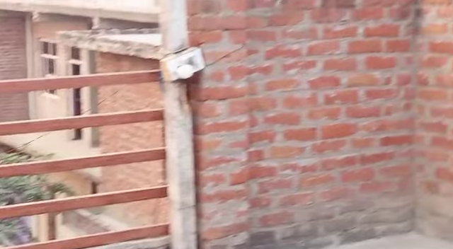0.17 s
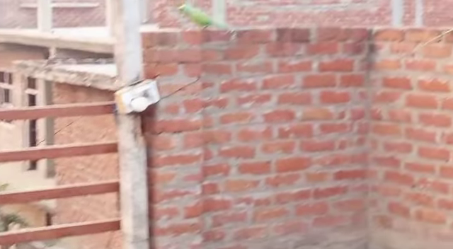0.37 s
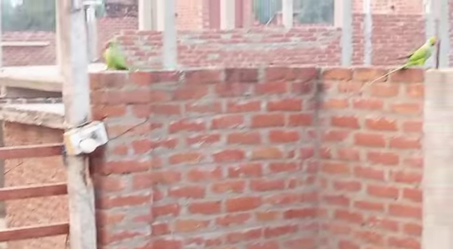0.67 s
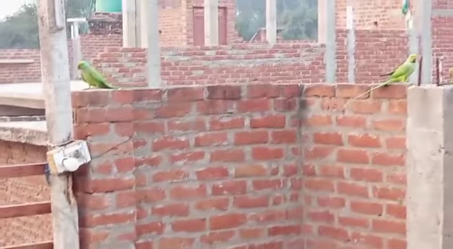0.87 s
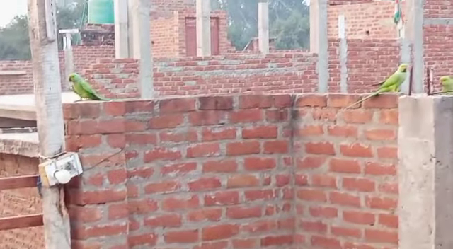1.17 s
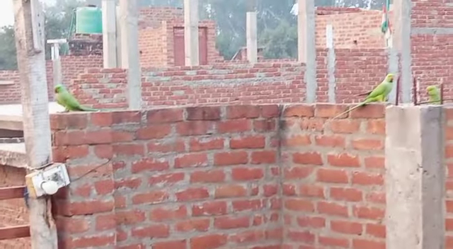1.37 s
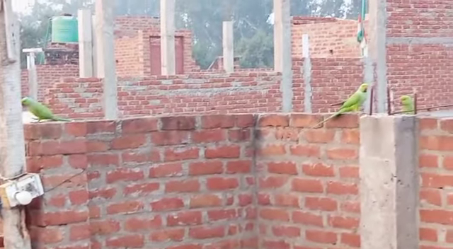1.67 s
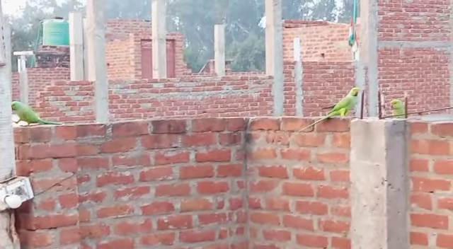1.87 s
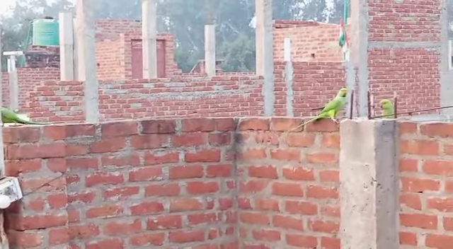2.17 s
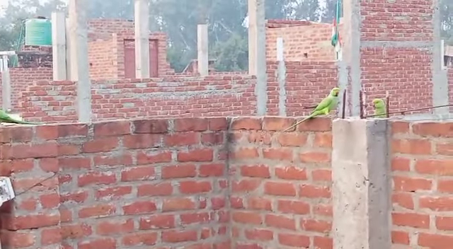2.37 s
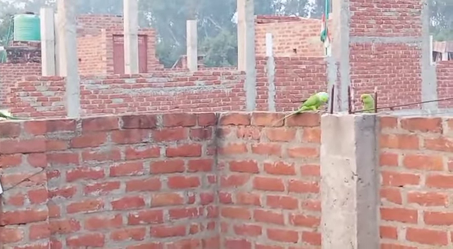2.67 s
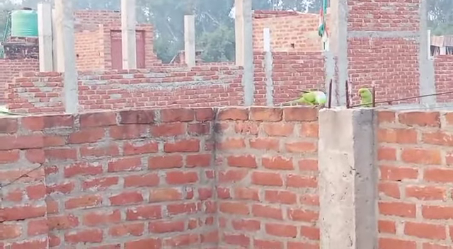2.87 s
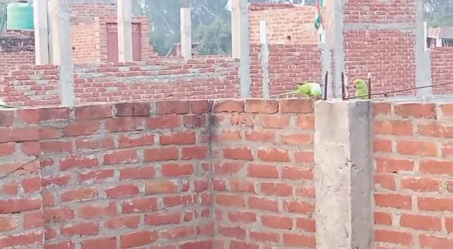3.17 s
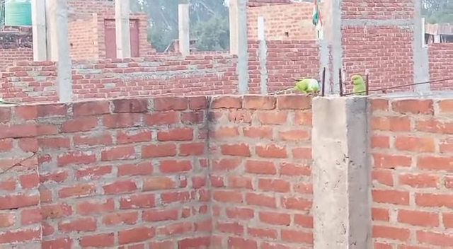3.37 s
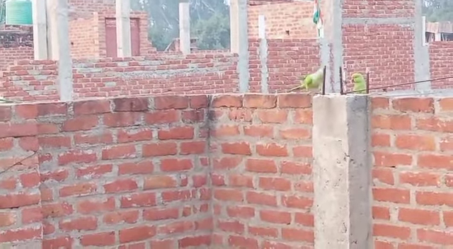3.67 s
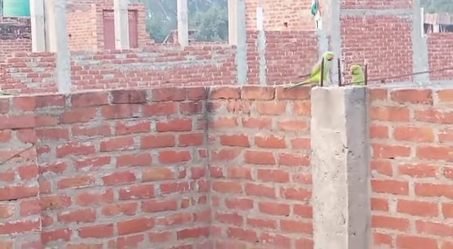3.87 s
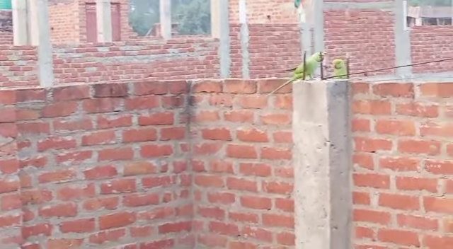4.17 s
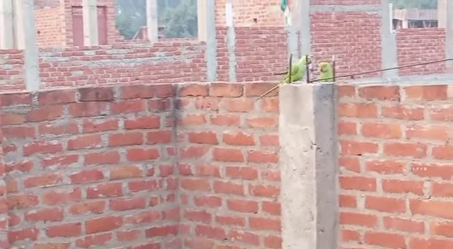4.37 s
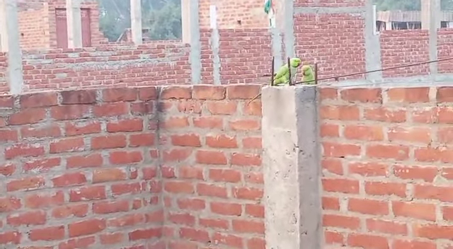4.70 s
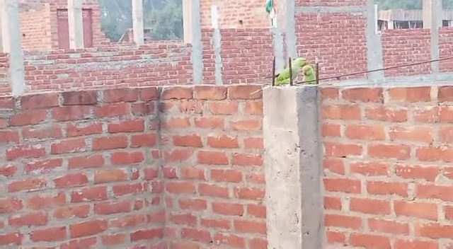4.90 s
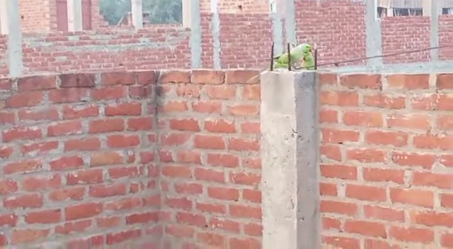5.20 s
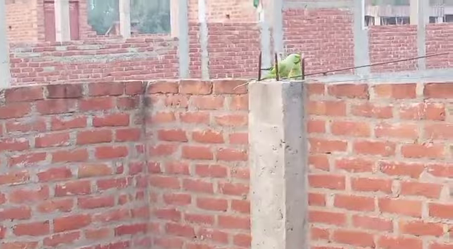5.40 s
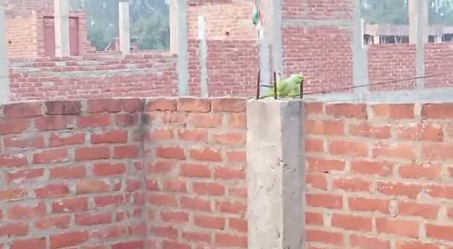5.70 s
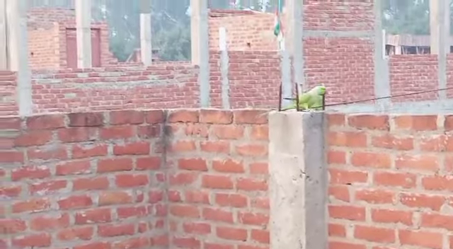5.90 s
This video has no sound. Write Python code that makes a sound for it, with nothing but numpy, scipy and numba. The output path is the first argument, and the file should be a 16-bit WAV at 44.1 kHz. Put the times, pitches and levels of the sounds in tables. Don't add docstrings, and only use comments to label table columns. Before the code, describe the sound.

Parakeets call loudly a few metres away on brick rooftops, picked up by a phone microphone with short wall echoes. From 0 to 0.5 s a rough shriek, a piercing whistle and a dropping cry run into barking yelps and a brief chatter. Around 0.6-1.2 s calls fall and bray more softly, with faint birds farther off. At 1.2-1.9 s a yelp, a high arching whistle and strong raspy shrieks arrive. Chatter and a loud nasal rise fill 1.9-2.4 s; after a short thinning, harsh screeches and stuttering chatter fill 2.65-3.7 s. Near 3.8 s a clear whistle dives under a swelling shriek. Rattles and a big grating bray come at 4.2-4.7 s, then plunging squawks, low chatter and a leaping whistle, a bright burst at 5.45 s, and a thinner last call fading by 5.95 s. A low town hum and faint engine thuds continue throughout, the engine slightly clearer after 3 s.

```python
import sys
import numpy as np
from scipy import signal
from scipy.fft import rfft, irfft, next_fast_len
from scipy.io import wavfile
from scipy.ndimage import uniform_filter1d
from numba import njit

SR = 44100
rng = np.random.default_rng(int(sys.argv[2]) if len(sys.argv) > 2 else 0)


def unload_audio(sound):
    columns = np.transpose(np.atleast_2d(sound))
    steps = np.round(np.clip(columns, -1, 1) * 32767)
    wavfile.write(sys.argv[1], SR, steps.astype(np.int16))


def to_linear_factor(level_db):
    exponent = np.asarray(level_db, float) / 20
    return 10 ** exponent


N = 266805

# frequency_hz, level_db
TOWN_COLOUR = [(79, -4.5), (135, 0), (418, -12), (1520, -9), (2260, -12.5), (3360, -12.5), (5000, -28),
               (7440, -30), (9820, -45), (15500, -43)]

# time_s, firings
FIRINGS = [(0, 0), (2.014, 27.5), (2.303, 31.5), (2.805, 38.5), (3.501, 48.5), (4.053, 56.5), (4.518, 63.5),
           (5.024, 71.5), (5.519, 79.5), (6.06, 88.6)]
# time_s, level_db
ENGINE_LEVEL = [(0, -48), (1, -44.5), (2, -48), (3, -41), (4, -40), (5, -41), (6.05, -41)]
# centre_hz, width_hz, level_db
EXHAUST = [(68.2, 4.3, -0.5), (119.3, 9.9, -2), (174, 45, -7), (293, 62, -8.5), (354, 90, -11)]

# start_s, end_s, peak_db, treble_db, throat_hz
AIRY_SWELLS = [(0.001, 0.105, -22, -10, 1720), (1.2, 1.313, -31, 9, 3130), (1.672, 1.868, -27.5, 5, 2270),
               (2.658, 2.871, -21.5, -15, 1560), (3.781, 4.112, -21.5, 4.5, 2740)]
AIRY_FADES = [(0.145, 0.21, -24.5, -3, 2980), (.3, 0.4, -27.5, -22, 2750), (0.66, 0.86, -32, -1, 2570),
              (0.877, 1.16, -38.5, 7, 2453), (2.866, 3.243, -29.5, -2, 1840),
              (3.229, 3.4, -24.5, 11.5, 2670), (4.915, 5.099, -25.5, 3.5, 2210)]
LOW_SWELLS = [
    (1.506, 1.66, -19, -2, 1668),
]
DRY_SWELLS = [(.45, 0.626, -41, -36, 1860), (1.938, 2.125, -22.5, 5, 3290), (2.118, 2.38, -34, 17, 3100),
              (2.399, 2.5, -27.5, -4, 1510), (4.39, 4.675, -19, 8, 2800), (4.742, 4.908, -27.5, -6, 1660),
              (5.656, 5.973, -41, 13, 2410)]
DRY_FADES = [
    (1.43, 1.492, -19, 0.97, 3440),
    (3.472, 3.69, -23, 0.5, 2390),
    (5.45, 5.62, -25, 3, 4050),
]
# start_s, end_s, centre_hz, width_hz, level_db
SHEENS = [(.01, 0.12, 10200, 1500, -47.5), (.3, 0.475, 9400, 1500, -40.5), (.66, .87, 9100, 1500, -48),
          (1.53, 1.86, 11700, 2507, -57), (1.94, 2.357, 10900, 900, -58), (2.1, 2.36, 14800, 800, -71),
          (2.662, 2.875, 10070, 500, -51.5), (2.66, 3.2, 13400, 3500, -60), (3.23, 3.4, 14000, 2500, -53),
          (3.23, 3.406, 9800, 2500, -41), (3.48, 3.657, 10200, 2000, -65), (3.79, 4.113, 10000, 2000, -50),
          (4.353, 4.683, 11160, 1200, -53), (4.35, 4.68, 9240, 800, -45), (4.45, 4.66, 15000, 700, -62.5),
          (4.903, 5.081, 10700, 2500, -67), (5.366, 5.442, 9050, 2000, -46),
          (5.427, 5.59, 9440, 1200, -38.5), (5.433, 5.597, 7740, 1200, -29)]

# frequency_hz, level_db
BEAK = [(2500, 11), (4500, -16.5), (6500, -5.5), (8000, -8.5), (9000, -25), (11500, -32), (13000, -44),
        (15500, -31)]

# start_s, length_s, first_pitch_hz, second_pitch_hz, level_db
OPENERS = [(.012, .075, 1789, 1247, -33)]
HOOKS = [(.012, 0.06, 1344, 1054, -35), (3.29, 0.074, 1010, 844, -36.5)]
YELPS = [(.265, 0.059, 1586, 1325, -19), (.4, 0.045, 1455, 1120, -19.5), (1.198, 0.07, 1716, 1326, -24.5),
         (1.438, .04, 1987, 1300, -26), (2.335, .04, 1257, 1155, -32.5)]
GROWLS = [(.31, .085, 1328, 1490, -27)]
CRESTS = [(.335, .075, 1408, 1461, -23)]
RASPS = [(3.49, 0.1627, 1218, 1253, -27), (1.94, .17, 1100, 1230, -30.5)]
PLUNGES = [(4.768, 0.036, 2350, 1400, -27.5), (4.83, 0.074, 2123, 1498, -31),
           (4.925, .065, 1049, 789, -29.5), (2.42, .07, 1300, 900, -39.5)]
FLATS = [(2.93, .12, 1080, 1068, -34), (2.87, 0.0438, 1500, 1080, -33)]
DULL_HOOKS = [(3.46, 0.031, 1643, 1592, -29.5), (4.742, 0.00933, 816, 717, -28.5)]
HOARSE_SQUEALS = [(3.47, 0.079, 1836, 1934, -21)]
SNARLS = [(4.0, 0.094, 1300, 1285, -31.5)]
BRAYS = [(4.385, .27, 882, 1218, -31)]
LUNGES = [(5.445, .165, 1716, 1326, -22.5)]

# start_s, length_s, first_pitch_hz, second_pitch_hz, level_db. In PIPINGS the
# rows at 2.53 and 2.56 s are two upper partials of a farther bird's low call, and the row at 0.41 s is a faint
WHISTLES = [(.082, 0.069, 2106, 2170, -13.5), (3.5, 0.048, 2055, 2100, -25),
            (3.815, 0.069, 2144, 2152, -15), (5.34, .19, 1083, 1358, -26)]
PIPINGS = [(2.34, 0.04, 1700, 1760, -33.5), (2.41, .06, 1580, 1620, -42), (2.38, 0.056, 3250, 3150, -36),
           (2.53, 0.114, 3050, 3150, -46), (2.56, 0.093, 2600, 2600, -48), (.41, .12, 4000, 4400, -48)]
DULL_GLIDES = [(1.61, 0.34, 1600, 1090, -35.5), (1.51, 0.13, 1900, 1500, -32.5)]
GLIDES = [(1.545, 0.315, 1437, 894, -37.5)]
SQUEALS = [(1.79, 0.13, 1837, 1830, -35)]
RISES = [(2.1, .26, 895.4, 959.6, -18)]
UNDERTONES = [(2.12, .21, 1016, 1060, -28)]
HOOTS = [(3.2, 0.058, 915, 965, -37), (2.8, 0.092, 790, 925, -42)]
ARCHES = [(3.215, 0.09, 882, 1038, -24.5)]
PEEPS = [(3.8, 0.0356, 1767, 1563, -23.5), (3.855, 0.032, 1610, 1510, -40)]
DROPS = [(3.882, .19, 1843, 1417, -15.5)]
LEAD_INS = [(4.18, .11, 2250, 1445, -46)]
TOOTS = [(5.19, .065, 764, 750, -29.5)]
LEAPS = [(5.382, .085, 1248, 1723, -19)]

# start_s, length_s, first_pitch_hz, second_pitch_hz, level_db
FARTHEST_CALLS = [(.27, 0.23, 841, 858, -41.5), (.5, .11, 854, 849, -36), (.63, 0.21, 834, 830, -40.5),
                  (2.78, 0.096, 842, 830, -38.5), (5.45, 0.067, 546, 644, -40)]
FAR_CALLS = [(1.17, 0.23, 858, 855, -44.5), (1.3, 0.065, 610, 650, -57), (4.77, 0.049, 594, 645, -34.5),
             (4.83, 0.097, 913, 960, -36)]

# time_s, pitch_hz, level_db
FIRST_DROP = [
    (.145, 1884, -38),
    (.165, 1658, -16.5),
    (.22, 1635, -16.5),
    (.255, 1601, -19.5),
    (.3, 1420, -26),
]
LONG_FALL = [(.625, 1518, -31), (.665, 1135, -30), (.7, 990, -35.5), (.8, 922.5, -27.5), (.9, 921.4, -29),
             (1.0, 910, -32.5)]
FIRST_BRAY = [
    (.645, 999, -36),
    (.665, 1232, -28),
    (.72, 1284, -25.5),
    (.8, 1248, -23.5),
    (0.869, 1202, -28),
]
DIP = [
    (.92, 865, -33),
    (.99, 836, -28.5),
    (1.04, 880, -32),
    (1.1, 900, -33),
    (1.15, 894, -37.5),
]
HIGH_ARCH = [(1.26, 1510, -37), (1.3, 2247, -32.5), (1.34, 2563, -27.5), (1.38, 2650, -26),
             (1.402, 2597, -20), (1.424, 1832, -31), (1.465, 1083, -37.5)]
FIRST_GRATE = [(2.66, 1080, -31), (2.7, 1098, -28), (2.8, 1103, -28), (2.85, 1140, -36)]
LOW_CALL = [(3.05, 766, -44.5), (3.201, 713.6, -37), (3.26, 624, -43.5), (3.331, 572, -43.5),
            (3.451, 601.4, -38.5), (3.629, 659, -53)]
DIVE = [(3.775, 1785, -21), (3.8, 1637, -20), (3.83, 1285, -30.5), (3.86, 1099, -25), (3.92, 935, -30),
        (3.982, 878, -28), (4.119, 1004, -35)]
BIG_GRATE = [(4.35, 1040, -27), (4.4, 1140, -24.5), (4.45, 1219, -18.5), (4.52, 1150, -19),
             (4.58, 1088, -20), (4.65, 1059, -24.5)]
SWOOP = [
    (4.9, 1403, -34.5),
    (4.93, 1102, -33),
    (4.96, 1255, -31.5),
    (5.05, 1275, -28.5),
]
LAST_CALL = [(5.629, 1044, -42), (5.701, 1123, -40), (5.8, 1161, -34), (5.88, 1167, -32), (5.92, 1135, -37),
             (5.946, 880, -38.5)]

# share of length 0-1, share of the way to the second pitch, level_db
DROP_SHAPE = [(0, 0.0045, -17), (.11, .5, 1.5), (.5, .55, -2), (.72, .68, -5.5), (0.999, 0.99, -8.5)]
STEADY_SHAPE = [(0, 0.0087, -5.5), (.6, .65, -0.5), (1, 0.95, -0.5)]
GLIDE_SHAPE = [(0, 0.19, 3.5), (.22, .48, 2), (.45, .82, 0.5), (1, 0.99, -5.5)]
HOOK_SHAPE = [(0, 0.002, -6), (0.552, 0.324, 1), (1, 0.95, 1.5)]
ARCH_SHAPE = [(0, -0.051, -6.5), (0.298, 0.97, -1), (.65, 0.99, -1), (1, -.3, 2)]
SWELL_SHAPE = [(0, 0.028, -6.5), (0.301, 0.9, 2), (0.601, .8, -2), (1, 0.082, -4)]
RISE_SHAPE = [(0, 0.0053, -13), (.27, .85, -9.5), (.75, 1, -2), (1, 0.94, -9)]
CLIMB_SHAPE = [(0, 0.02, -3.5), (0.452, .7, -4.5), (.8, 1, -2), (1, 0.97, -10.5)]
SLUMP_SHAPE = [(0, 0, -4.5), (.3, 0.38, -2.5), (.7, .8, -3.5), (1, 1, -6)]
FLARE_SHAPE = [(0, 0.0098, -6), (.12, 0.82, 0), (.35, 0.99, -0.5), (1, 1, 4.5)]
PLUNGE_SHAPE = [(0, 0.0089, -3.5), (.7, 0.202, 0), (1, 1, 4)]

# frequency_hz, level_db
TIGHT = [(900, -16.5), (1700, -15), (2150, -12), (3200, -4.5), (4300, -5.5), (5000, -37), (6500, -9.5),
         (8600, -12)]
OPEN = [(600, -5), (1000, -5.5), (2200, -1.5), (3300, -5.5), (4500, -11.5), (6500, -14)]
SHARP = [(800, -10), (1300, -5.5), (2200, -1.5), (3000, 1.5), (4300, 0), (6500, -17)]
HOARSE = [(1150, -18), (1600, -16), (2400, -4.5), (3300, -5), (3700, -4.5), (4700, -18.5), (6500, -18)]
PURE = [(1500, -2.5), (2500, -1), (3700, 2), (5000, -5.5), (7500, -8), (10000, -30.5)]
DEEP = [(900, -14.5), (1700, -19.5), (2000, -5.5), (3000, 1), (3600, -2.5), (5200, -15.5), (7000, -3.5)]
DISTANT = [(600, -8), (850, -6), (1600, -6), (2500, -8), (3400, -25)]
MUFFLED = [(600, -5), (850, -1), (1700, -10), (2500, -9.5), (3400, -29)]
RINGING = [(1600, -15), (3250, -1.5), (4900, -9), (6500, -19.5)]
NASAL = [(950, -23.5), (1300, -19), (1900, -13), (2700, -5), (3800, -6.5), (5000, -15)]
SHRILL = [(1850, -35), (3700, -11), (5600, -4), (7500, -19)]
BLUNT = [(800, -10), (1600, 2.5), (2200, -2), (4300, -11), (6500, -4.5), (8700, -33)]
REEDY = [(900, -13.5), (1800, -9.5), (2700, -7.5), (3600, -12)]
YELPING = [(1300, -15.5), (2800, 2), (3600, -11.5), (4400, -12), (6500, -15)]
BRAYING = [(1200, -16.5), (2450, -2.5), (3700, -5), (4900, -17)]
GRATING = [(1100, -24), (2200, -19), (3300, -1), (4400, -16.5)]
STACKED = [(1250, -11), (2500, -4), (3800, -3), (5000, -3)]
PIPING = [(1700, 0), (4500, -2.5), (5000, -32), (9000, -40)]
SQUAWKING = [(1500, -11), (3000, -2.5), (4200, -2.5), (5200, -3.5), (6500, -4)]
HOLLOW = [(1000, -6), (1600, -1), (2200, 0), (3500, -10), (4500, -7.5), (6500, -21)]
SAGGING = [(1600, -18), (3180, -9), (3290, 1.5), (4800, 1), (4960, -11.5), (6500, -13.5)]
ARCHING = [(1450, -16), (2900, -6), (4400, -3), (5900, -16)]
LEAPING = [(1600, -16), (3400, 0), (4500, -18), (5050, -3), (6500, -21)]
TOOTING = [(750, -3.5), (1500, 0), (2250, -18), (3000, -25)]

# start_s, period_s, pitch_hz, level_db, open share 0-1
CHATTER = [(0.447, 0.024, 1950, -31.5, 0.45), (1.942, 0.019, 1936, -30, 0.86),
           (3.064, 0.021, 2105, -27, 0.6), (4.188, 0.025, 1636, -29, 0.49),
           (4.189, 0.0258, 2150, -29.5, 0.47), (4.341, .0098, 1050, -22, 0.59),
           (5.086, 0.027, 1010, -30.5, 0.68), (3.0, 0.022, 1680, -35, 0.56)]
CHATTER_COUNT = [6, 7, 9, 6, 6, 6, 10, 9]
# frequency_hz, level_db
CHATTER_THROAT = [(1000, -5), (2000, -2.5), (3100, -14), (3700, -20)]
RATTLE_THROAT = [(1000, -11), (2000, -7), (3100, -5), (4200, -16.5)]
# pitch_hz, level_db
CHATTER_UPPER = [(1064, -3.5), (1900, -29)]
# time_s, peak_db
SNAPS = [(0.5003, -49), (0.5237, -51), (0.549, -48), (1.937, -43), (1.955, -43), (1.9689, -41),
         (1.9899, -40), (4.1694, -49), (4.1954, -50), (4.2443, -44), (4.2667, -43), (4.2941, -44),
         (4.32, -47)]


def level(x, db):
    return x * to_linear_factor(db) / np.sqrt(np.mean(x ** 2))


def wobble(size, hz):
    settle = 2000
    noise = rng.standard_normal(size + settle)
    return level(signal.lfilter(*signal.butter(2, hz, fs=SR), noise)[settle:], 0)


def on_log(table, hz):
    f, db = np.transpose(table)
    return np.interp(np.log(hz), np.log(f), db)


@njit
def moving_band(x, hz, width):
    y, b, l = np.empty(len(x)), 0., 0.
    for i in range(len(x)):
        g, k = np.tan(np.pi * hz[i] / SR), width / hz[i]
        v = (b + g * (x[i] - l)) / (1 + g * (g + k))
        b, l, y[i] = 2 * v - b, l + 2 * g * v, k * v
    return y


def band(x, hz, width):
    return moving_band(x, np.full(len(x), 1. * hz), 1. * width)


def double_band(x, hz, width):
    return band(band(x, hz, width), hz, width)


def town():
    size = next_fast_len(N)
    hz = np.maximum(np.arange(size // 2 + 1) * SR / size, 1)
    spectrum = rfft(rng.standard_normal(size)) * to_linear_factor(on_log(TOWN_COLOUR, hz))
    hum = irfft(spectrum, size)[:N]
    return level(hum * to_linear_factor(1.2 * wobble(N, 5.)), -43.5)


def engine():
    s, count = np.transpose(FIRINGS)
    timing, strength = rng.standard_normal((90, 2)).T
    times = np.interp(np.arange(90) - .5, count, s) + 0.0025 * timing
    pulses = np.zeros(N)
    pulses[np.clip(times * SR, 0, N - 1).astype(int)] = to_linear_factor(0.73 * strength)
    pipe = np.zeros(N)
    for k, (hz, width, db) in enumerate(EXHAUST):
        pipe += (-1) ** k * level(band(pulses, hz, width), db)
    pipe = signal.sosfilt(signal.butter(4, [48, 480], "bandpass", fs=SR, output="sos"), pipe)
    return level(pipe, 0) * to_linear_factor(np.interp(np.arange(N) / SR, *np.transpose(ENGINE_LEVEL)))


def chaotic_pulses():
    scatter, strength = rng.standard_normal((N // 16, 2)).T
    unsteady = .055 * scatter + .06 * wobble(N // 16, 1500)
    places = np.cumsum(1 + SR / 980 * np.exp(unsteady)).astype(int)
    inside = places < N
    pulses = np.zeros(N)
    pulses[places[inside]] = to_linear_factor(5.6 * np.clip(strength, -2, 2))[inside]
    pulses = pulses * to_linear_factor(1.1 * wobble(N, 490) + 0.54 * wobble(N, 40))
    return signal.sosfilt(signal.butter(6, 9000, fs=SR, output="sos"), pulses)


def breath_hiss():
    air = rng.standard_normal(N) * to_linear_factor(2.5 * wobble(N, 60))
    return sum(to_linear_factor(4.0 * wobble(N, 7.4)) * double_band(air, hz, 900) for hz in (10300, 12300, 14400))


def shrieks():
    pulses = chaotic_pulses()
    broad = level(double_band(pulses, 2860, 1970), -6) + level(band(pulses, 1600, 1200), -43)
    beak = level(double_band(pulses, 6040, 2200), -14) + level(double_band(pulses, 7280, 1200), -12)
    beak = signal.sosfilt(signal.butter(6, 8700, fs=SR, output="sos"), beak)
    hiss = level(breath_hiss(), 0)
    out = np.zeros(N)
    # rows, rise_db, hiss_db, broad_db
    kinds = [(AIRY_SWELLS, 13.5, -55.5, 0), (AIRY_FADES, -5, -55.5, 0), (LOW_SWELLS, 9, -74, -7),
             (DRY_SWELLS, 9, -74, 0), (DRY_FADES, -6.5, -74, 0)]
    for rows, rise_db, hiss_db, broad_db in kinds:
        for start, end, peak_db, treble_db, throat_hz in rows:
            span = slice(int(start * SR), int((end + 0.0066) * SR))
            t = np.arange(N)[span] / SR
            edges = np.clip(np.minimum((t - start) / 0.0031, (t[-1] - t) / 0.053), 0, 1)
            ends_db = [peak_db - max(rise_db, 0), peak_db + min(rise_db, 0)]
            db = np.interp(t, [start, end], ends_db)
            sag = 0.026 * (rise_db < 0) * np.linspace(.5, -.5, len(t))
            sinking = throat_hz * (1 + sag)
            throat = moving_band(moving_band(pulses[span], sinking, 470.), sinking, 470.)
            voice = level(throat, -7) + to_linear_factor(broad_db) * broad[span] + to_linear_factor(treble_db) * beak[span]
            out[span] += edges * to_linear_factor(db) * voice
            out[span] += edges * to_linear_factor(hiss_db + db - db.max()) * hiss[span]
    return out


def beak_grit():
    return rng.standard_normal(N) * to_linear_factor(2.3 * wobble(N, 300))


def sheens():
    grit = beak_grit()
    t, out = np.arange(N) / SR, np.zeros(N)
    for start, end, hz, width, db in SHEENS:
        span = slice(int(start * SR), int(end * SR))
        edges = np.clip(np.minimum((t[span] - start) / 0.032, (end - t[span]) / 0.059), 0, 1)
        ring = band(double_band(grit[span], hz, width), hz, width)
        out[span] += edges * level(ring, db)
    return out


def syrinx(hz, jitter, low_db, upper_db):
    size, rough = len(hz), abs(jitter)
    tremble = jitter * 1.524 * wobble(size, 440) + .5 * wobble(size, 44.2)
    phase = 2 * np.pi * np.cumsum(hz * (1 + tremble / 100)) / SR
    beat = np.sin(2 * np.pi * np.cumsum(230 * (1 + 0.119 * wobble(size, 29.7))) / SR)
    out = 0
    for k in range(1, int(15500 // hz.max()) + 1):
        db = low_db[k - 1] if k <= len(low_db) else upper_db + on_log(BEAK, k * hz)
        flutter_db = 2.92 * wobble(size, 17.9) + min(3.7 * rough, 3.2) * wobble(size, 343)
        out = out + to_linear_factor(db + flutter_db) * np.sin(k * phase + 2 * np.pi * rng.random())
    return np.sqrt(2) * out * (1 + min(0.11 * rough, .6) * beat)


def paths(rows, shape):
    share, way, swell_db = np.transpose(shape)
    return [(start + length * share, first + (second - first) * way, db + swell_db)
            for start, length, first, second, db in rows]


def sing(calls, throat, jitter, upper_db):
    out = np.zeros(N + SR)
    for s, hz, db in calls:
        first = max(int(s[0] * SR), 0)
        t = np.arange(first, int((s[-1] + 0.024) * SR)) / SR
        edges = np.clip(np.minimum((t - s[0]) / 0.0033, (t[-1] - t) / 0.055), 0, 1)
        path = uniform_filter1d(np.interp(t, s, hz), size=SR // 80, mode="nearest")
        low_db = on_log(throat, np.outer([1, 2, 3, 4], path))
        voice = syrinx(path, jitter, low_db, upper_db)
        out[first:first + len(t)] += edges * to_linear_factor(np.interp(t, s, db)) * voice
    return out[:N]


def rough_calls():
    grates = [np.transpose(FIRST_GRATE), np.transpose(BIG_GRATE)]
    return (sing(paths(OPENERS, SLUMP_SHAPE), HOLLOW, jitter=2.2, upper_db=-18)
            + sing(paths(HOOKS, HOOK_SHAPE), SHARP, jitter=1.8, upper_db=-8.5)
            + sing(paths(YELPS, SLUMP_SHAPE), YELPING, jitter=1.34, upper_db=-8.5)
            + sing(paths(GROWLS, STEADY_SHAPE), YELPING, jitter=1.8, upper_db=-17)
            + sing(paths(CRESTS, ARCH_SHAPE), ARCHING, jitter=0.69, upper_db=-5)
            + sing([np.transpose(LONG_FALL)], REEDY, jitter=0.67, upper_db=-5.5)
            + sing([np.transpose(FIRST_BRAY)], BRAYING, jitter=2.3, upper_db=-5)
            + sing(paths(RASPS, SWELL_SHAPE), HOARSE, jitter=2.26, upper_db=-7.5)
            + sing(paths(PLUNGES, PLUNGE_SHAPE), HOLLOW, jitter=1.23, upper_db=-15)
            + sing(grates, GRATING, jitter=2.5, upper_db=-8.5)
            + sing(paths(FLATS, STEADY_SHAPE), OPEN, jitter=0.89, upper_db=-16)
            + sing([np.transpose(LOW_CALL)], OPEN, jitter=0.9, upper_db=-10)
            + sing(paths(DULL_HOOKS, HOOK_SHAPE), BLUNT, jitter=1.6, upper_db=-11)
            + sing(paths(HOARSE_SQUEALS, STEADY_SHAPE), SHRILL, jitter=1.1, upper_db=-25)
            + sing(paths(SNARLS, HOOK_SHAPE), TIGHT, jitter=1.67, upper_db=-11)
            + sing(paths(BRAYS, FLARE_SHAPE), BRAYING, jitter=2.15, upper_db=-3)
            + sing(paths(LUNGES, SLUMP_SHAPE), SQUAWKING, jitter=3.2, upper_db=0))


def clear_calls():
    return (sing(paths(WHISTLES, STEADY_SHAPE), TIGHT, jitter=0.28, upper_db=-13)
            + sing([np.transpose(FIRST_DROP)], SAGGING, jitter=0.16, upper_db=-6.5)
            + sing(paths(PIPINGS, STEADY_SHAPE), PIPING, jitter=0.54, upper_db=-40)
            + sing([np.transpose(DIP)], REEDY, jitter=0.5, upper_db=-6.5)
            + sing([np.transpose(HIGH_ARCH)], PURE, jitter=0.48, upper_db=5)
            + sing(paths(DULL_GLIDES, GLIDE_SHAPE), OPEN, jitter=0.7, upper_db=-18)
            + sing(paths(GLIDES, GLIDE_SHAPE), OPEN, jitter=0.2, upper_db=1)
            + sing(paths(SQUEALS, STEADY_SHAPE), SHRILL, jitter=0.19, upper_db=-25)
            + sing(paths(RISES, CLIMB_SHAPE), NASAL, jitter=0.54, upper_db=-8.5)
            + sing(paths(UNDERTONES, CLIMB_SHAPE), GRATING, jitter=0.34, upper_db=-20)
            + sing(paths(HOOTS, STEADY_SHAPE), HOLLOW, jitter=0.43, upper_db=-13)
            + sing(paths(ARCHES, ARCH_SHAPE), DEEP, jitter=0.57, upper_db=-0.5)
            + sing([np.transpose(DIVE)], DEEP, jitter=0.33, upper_db=-2)
            + sing(paths(PEEPS, GLIDE_SHAPE), RINGING, jitter=0.49, upper_db=-30)
            + sing(paths(DROPS, DROP_SHAPE), RINGING, jitter=0.15, upper_db=-4)
            + sing(paths(LEAD_INS, SLUMP_SHAPE), RINGING, jitter=0.6, upper_db=-30)
            + sing([np.transpose(SWOOP)], STACKED, jitter=0.39, upper_db=-3)
            + sing(paths(TOOTS, STEADY_SHAPE), TOOTING, jitter=0.3, upper_db=-9.5)
            + sing(paths(LEAPS, RISE_SHAPE), LEAPING, jitter=0.42, upper_db=-33)
            + sing([np.transpose(LAST_CALL)], OPEN, jitter=0.076, upper_db=-7))


def far_calls():
    return (sing(paths(FARTHEST_CALLS, STEADY_SHAPE), MUFFLED, jitter=0.72, upper_db=-40)
            + sing(paths(FAR_CALLS, STEADY_SHAPE), DISTANT, jitter=0.74, upper_db=-9))


def slap(x):
    lag = int(.021 * SR)
    return to_linear_factor(-15.5) * np.concatenate([np.zeros(lag), x[:-lag]])


def walls(x):
    t60_s, first_echo_s = 0.2, .008
    t = np.arange(SR // 2) / SR
    tail = rng.standard_normal(len(t)) * to_linear_factor(-60 * t / t60_s) * (t > first_echo_s)
    tail = band(tail, 1480, 5800)
    return signal.fftconvolve(x, tail / np.sqrt(np.sum(tail ** 2)))[:N] * to_linear_factor(-9.5)


def chatter():
    out = np.zeros(N)
    for (start, period, hz, db, share), count in zip(CHATTER, CHATTER_COUNT):
        turn = np.arange(int(period * count * SR)) / SR / period
        within = turn % 1
        gate = np.clip(np.minimum(within / .24, (share - within) / .12), 0, 1)
        swell = to_linear_factor(-7.0 * (2 * turn / count - 1.1) ** 2)
        if hz > 1400:
            throat = CHATTER_THROAT
        elif period > .015:
            throat = RATTLE_THROAT
        else:
            throat = GRATING
        low_db = on_log(throat, np.arange(1, 4300 // hz + 1) * hz)
        pitch = hz * (1.03 - 0.054 * within)
        voice = syrinx(pitch, np.maximum(hz / 420, 3.2), low_db, on_log(CHATTER_UPPER, hz))
        out[int(start * SR):][:len(turn)] += to_linear_factor(db) * gate * swell * voice
    return out


def beak_snaps():
    grit = beak_grit()
    snap = level(double_band(grit, 8800, 2500), 0) + level(double_band(grit, 14900, 1200), -10)
    t, gate = np.arange(N) / SR, np.zeros(N)
    for s, db in SNAPS:
        age = t[int(s * SR):][:SR // 20] - s
        gate[int(s * SR):][:len(age)] += to_linear_factor(db - 4) * np.exp(-age / 0.005)
    return gate * snap


def scene():
    background = town() + engine()
    shrieking = shrieks()
    ring = sheens()
    calls = rough_calls() + clear_calls() + far_calls()
    birds = shrieking + calls + slap(calls)
    clatter = chatter()
    echoes = walls(birds + to_linear_factor(0.5) * clatter)
    return (birds + clatter + echoes + ring + beak_snaps() + background)[None]


def band_limit(x):
    return signal.sosfilt(signal.butter(12, 16620, fs=SR, output="sos"), x)


def record(dry):
    peak_limit = .9
    rounded = peak_limit * np.tanh(dry / peak_limit)
    mix = signal.sosfilt(signal.butter(4, 52, "highpass", fs=SR, output="sos"), rounded)
    mix = signal.sosfilt(signal.ellip(10, .2, 80, 15600, fs=SR, output="sos"), mix)
    return band_limit(mix)


dry = scene()
out = record(dry)
unload_audio(out)
```